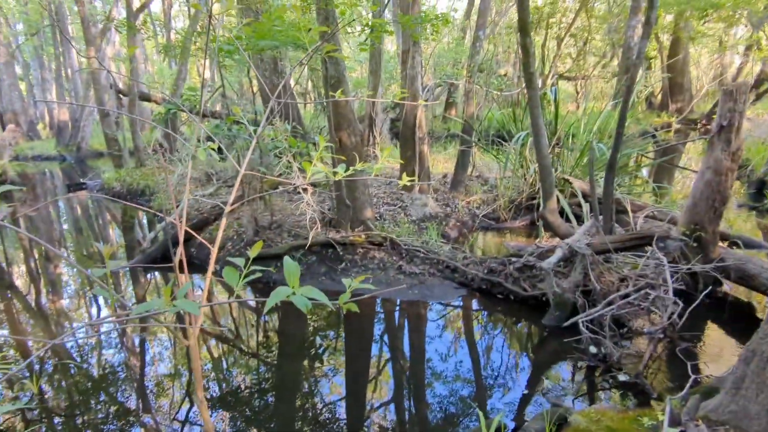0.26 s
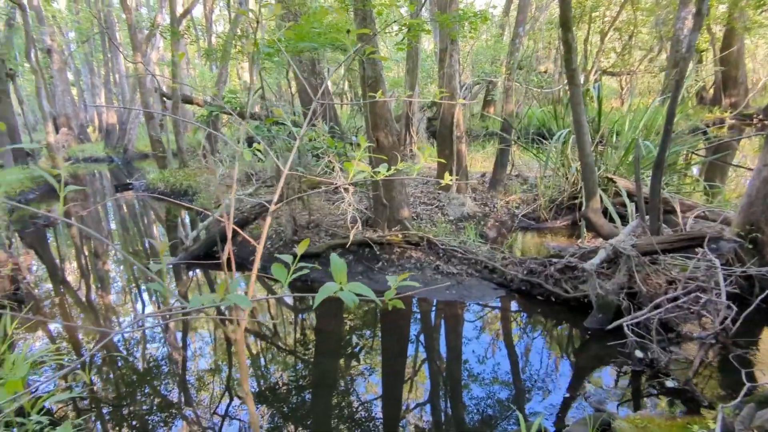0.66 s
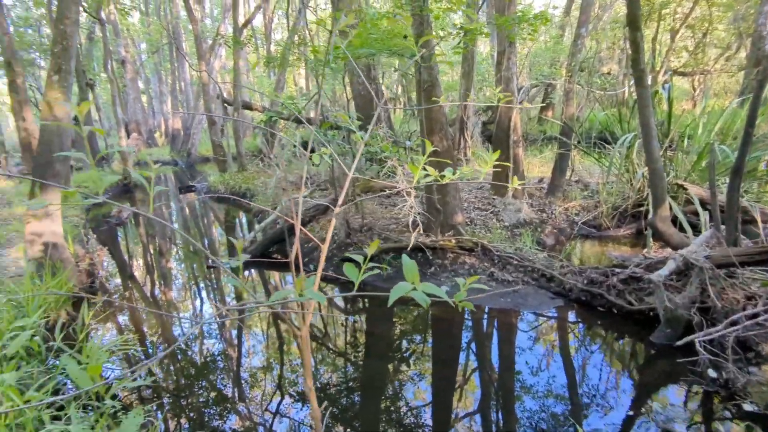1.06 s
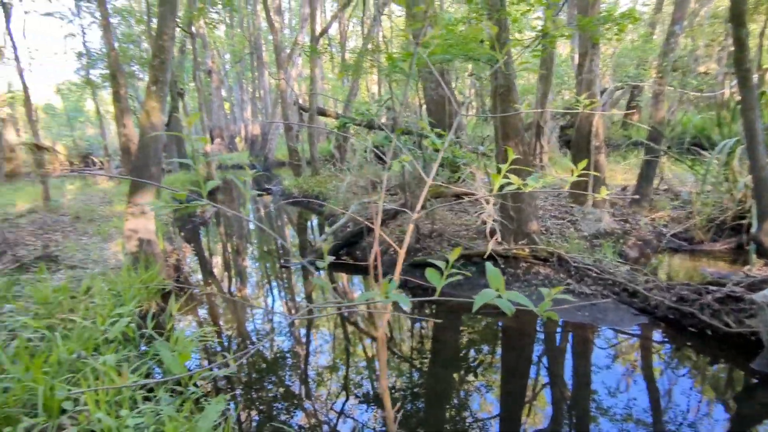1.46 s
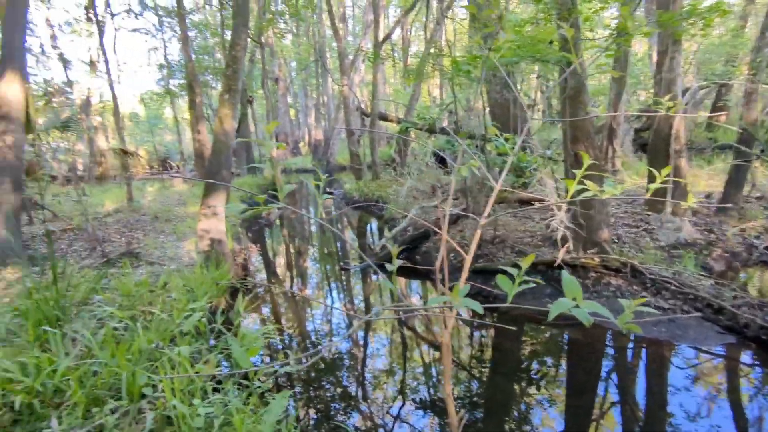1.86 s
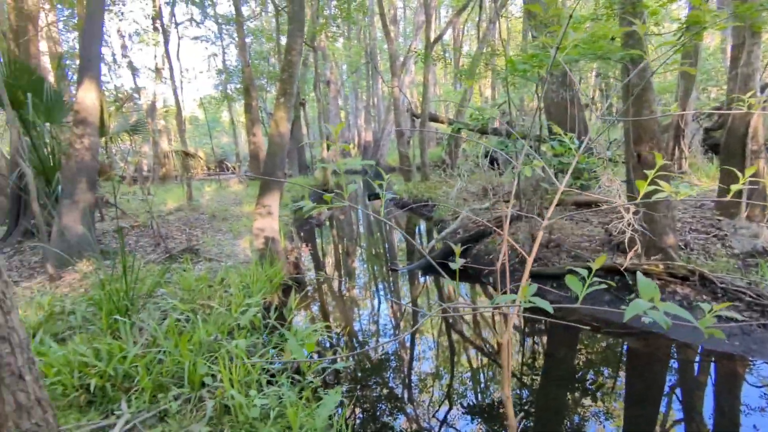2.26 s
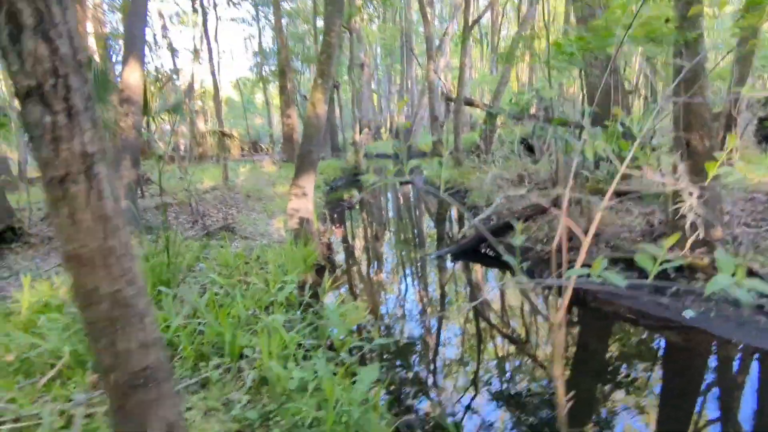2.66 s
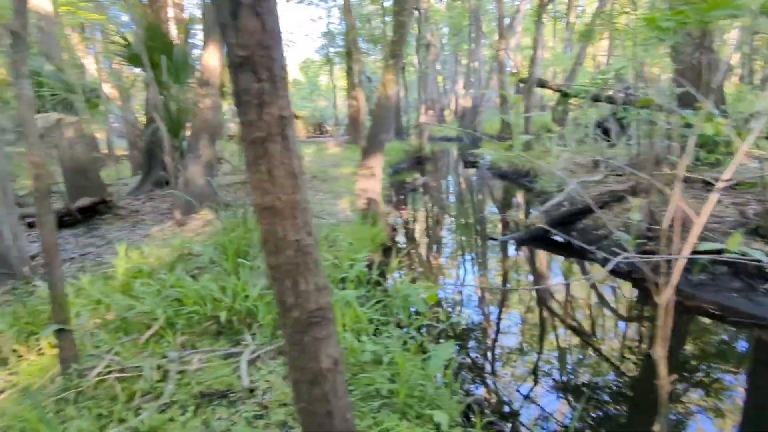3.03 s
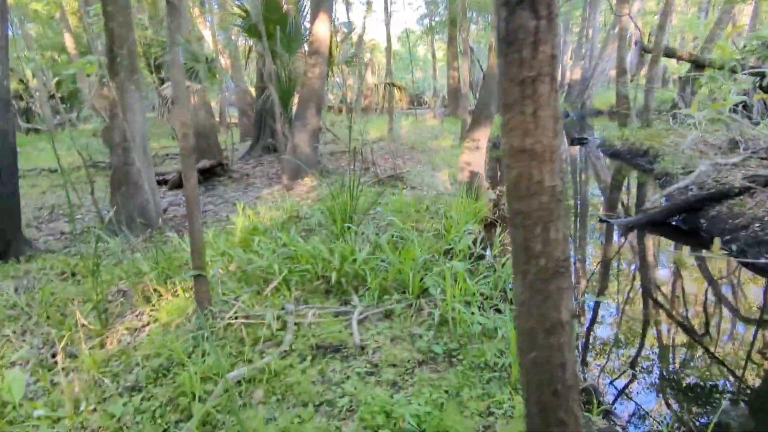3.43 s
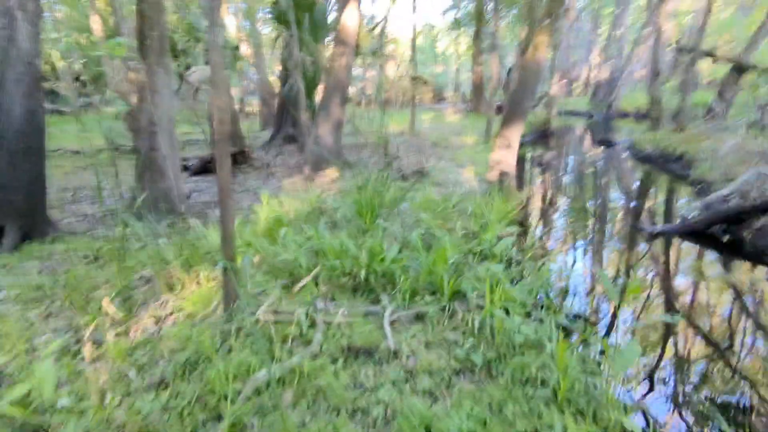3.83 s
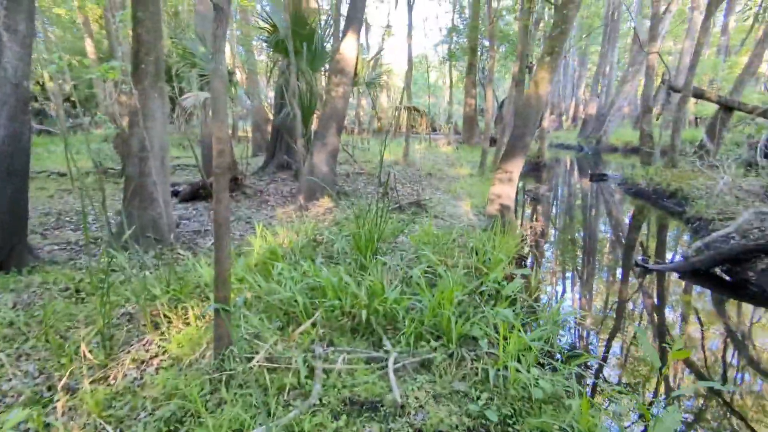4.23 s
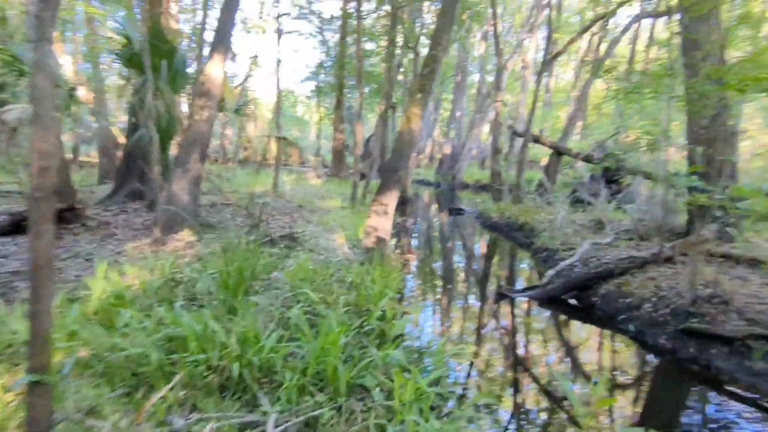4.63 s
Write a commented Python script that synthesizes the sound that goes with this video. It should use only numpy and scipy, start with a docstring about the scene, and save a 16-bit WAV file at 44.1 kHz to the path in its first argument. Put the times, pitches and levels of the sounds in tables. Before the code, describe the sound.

Distant highway traffic rumbles and roars through swampy woods, with a low engine drone fading, faint cricket chirps, and a few dry snaps late on.

```python
"""A highway heard from afar through swampy woods: from the start coloured noise makes rumble, roar and sizzle.
A heavy engine, a stack of sine orders, draws away; a near cricket chirps in short falling sine sweeps, far
insects hiss behind it, and the person holding the microphones turns slowly. Sine drones of other engines come
in midway; then plants are brushed, as swishing noise and dry snaps, while a nearer vehicle's roar grows to a
peak close to the end. A faint microphone hiss lies under it all."""
import sys
import numpy as np
from scipy import signal
from scipy.fft import rfft, irfft
from scipy.io import wavfile
from scipy.ndimage import map_coordinates

SR = 44100
rng = np.random.default_rng(int(sys.argv[2]) if len(sys.argv) > 2 else 0)


def master(y):
    """Save y as 16-bit WAV."""
    cut = np.clip(np.atleast_2d(y).T, -1, 1)
    pcm = np.round(cut * 32767)  # scale
    wavfile.write(sys.argv[1], SR, pcm.astype(np.int16))


N = 215776

# Spectra set only the shape of a noise; its loudness is given apart, as rms dB re full scale.
# In every left-right column, a positive level favours the left; a positive lag delays the left.

# Far lanes of the highway: columns [time_s, rumble_level_db, sizzle_level_db]
FAR_ROAD_LEVELS = [(0, -26.5, -45.5), (1, -27.5, -47.5), (2.3, -29.5, -46.5), (3.2, -31.5, -61.5),
                   (4, -30, -46.5), (4.89, -25.5, -43.5)]
# Low rumble of the far lanes: columns [frequency_hz, relative_density_db_per_hz]
RUMBLE_SPECTRUM = [(10, -58), (20, -30.5), (32, -20), (45, -4), (60, 5), (82, 6), (118, 2.5), (150, 1),
                   (190, -7), (235, -5.5), (270, -19.5), (400, -71.5), (1500, -110)]
# Tyre roar of the far lanes: columns [frequency_hz, relative_density_db_per_hz]
ROAR_SPECTRUM = [(60, -51), (120, -29), (220, -6), (330, 0.5), (560, -4), (880, -1.5), (1240, -10.5),
                 (1800, -21.5), (2600, -54), (5000, -100)]
# Tyre sizzle of the far lanes: columns [frequency_hz, relative_density_db_per_hz]
SIZZLE_SPECTRUM = [(400, -63.5), (800, -25), (1300, 0.5), (2030, -3.5), (3000, -16), (3800, -23.5),
                   (5400, -32), (7000, -43.5), (11000, -91.5)]
# Sound straight from the road: columns [frequency_hz, share_of_power (0 to 1)]
DIRECT_SHARE = [(60, 0.045), (300, 0.29), (800, 0.22), (1400, .4), (2000, 0.15), (4000, 0.4)]
# Sound scattered by the trunks: columns [frequency_hz, left_right_correlation (-1 to 1)]
SCATTER_LIKENESS = [(30, 1), (80, 0.99), (200, 1), (400, 0.58), (700, 0.084), (1000, 0.055), (1400, -0.18),
                    (2200, 0.22), (16000, -0.72)]
# Balance of the traffic noise: columns [frequency_hz, left_minus_right_db]
TRAFFIC_BALANCE = [(60, .3), (200, .3), (330, -1.2), (640, 1.8), (950, .5), (1410, 1), (2090, 1.5),
                   (3100, 2.5), (4600, 1)]
ROAR_DB, ROAD_LAG_MS = -33.5, -.42

# Heavy engine drawing away, its note sinking: columns [time_s, turns_per_s, loudest_order_level_db]
HEAVY_ENGINE = [(0, 21.5, -33), (.25, 21.5, -21), (.5, 21.3, -25.5), (.8, 21.1, -21), (1.27, 20.8, -19),
                (1.92, 20.65, -22.5), (2.05, 20.2, -30.5), (3, 20.4, -28.5), (3.6, 20.2, -31),
                (4.2, 20.3, -28.5), (4.5, 19.6, -35.5), (4.89, 19.9, -30.5)]
# Its other orders, swelling and fading: columns [start_s, end_s, order (multiple of turning), level_db]
ORDER_SWELLS = [(-0.5, 1.2, 3, -29), (2, 2.4, 3, -39.5), (2.5, 4.89, 3, -33.5), (0.76, 1.85, 7, -35),
                (0, .55, 8, -31), (0.2, 1.66, 8, -42), (1.94, 2.63, 8, -36), (2, 0.72, 10, -41.5)]
LOUDEST_ORDER = 5
DRONE_WAVER_DB, DRONE_WAVER_HZ = .7, .25
DRONE_FADE_DB_PER_S = 78.5  # both in and out

# Nearer vehicle's tyre roar: columns [frequency_hz, relative_density_db_per_hz]
NEARER_TYRE_SPECTRUM = [(60, -50.5), (150, -6), (300, -18), (600, -3.5), (780, -0.5), (950, -7),
                        (1200, -11), (2000, -18.5), (3200, -28), (5000, -38.5), (7000, -61), (12000, -90)]
CLOSEST_S, CLOSEST_DB, NEARER_LAG_MS = 4.67, -30.5, -.15
PASSING_S = 0.55  # closest distance over speed

# Near cricket as the microphones turn: columns [time_s, level_db, left_minus_right_db]
CRICKET_LEVELS = [(0, -58.5, 1.5), (.8, -59, 4), (1.2, -62, 0), (1.65, -61, 0), (2.3, -63, 0.5),
                  (2.75, -62.5, 0.5), (3.15, -57, -3), (3.9, -61, 0), (4.3, -61.5, 2), (4.89, -64, -5)]
# Its arrival as the microphones turn: columns [time_s, left_lag_ms]
CRICKET_LAG = [(0, -.15), (.7, -.12), (1.65, 0), (2.75, .05), (3.5, .17), (4.3, .205), (4.89, .09)]
# Successive chirps: one column [wing_strokes (count)]
CHIRP_STROKES = [4, 5, 4, 5, 5, 4, 4, 4, 5, 4, 5, 4, 5, 5, 4, 5, 5, 4, 4, 5, 5, 5, 4, 4, 4, 4, 4, 4, 5, 4,
                 5, 5, 4, 5, 4, 5, 4, 5, 4, 4, 4, 4, 4, 5, 6, 5, 5, 4]
FIRST_CHIRP_S, STROKE_PERIOD_S = -.0088, .0177
REST_S, REST_PER_STROKE_S = .01037, .00301  # a longer chirp earns a longer rest
SWEEP_S, SWEEP_FROM_HZ, SWEEP_TO_HZ = 0.012, 5100, 4144  # before each stroke's own pitch shift
FIRST_STROKE_DB = -2
STROKE_SPREAD_HZ, STROKE_SPREAD_DB = 60, 2.0
TRUNK_ECHO_DB, TRUNK_T60_S = -7, .07  # echo level re the direct song

# Far insects: columns [frequency_hz, relative_density_db_per_hz]
CHORUS_SPECTRUM = [(2500, -60.5), (3400, -55.5), (3900, -6), (4300, -2), (5000, -7), (5300, -10.5),
                   (5700, -45.5), (7000, -68.5)]
CHORUS_DB = -64.5

# Microphone hiss: columns [frequency_hz, relative_density_db_per_hz]
HISS_SPECTRUM = [(1000, -28), (3000, -5), (5500, -7.5), (6500, -10), (8000, -6), (9200, -1.5), (12000, -6),
                 (14000, -15), (16500, -9)]
HISS_DB, CUTOFF_HZ = -78.5, 15750

# Drones of other engines: columns [start_s, end_s, start_pitch_hz, end_pitch_hz, level_db]
OTHER_DRONES = [(2.351, 2.75, 96, 96.03, -32.5), (2.948, 4.6, 95.6, 94.64, -30.5),
                (3.9, 4.352, 214, 210, -39), (4.45, 4.891, 125, 125.2, -37), (4.55, 4.887, 152, 151, -37.5)]

# Cloth and leaves brushed near the microphones: columns [start_s, held_s, level_db before flutter]
BRUSHES = [(3.105, .008, -70.5), (3.26, .12, -74), (3.56, .03, -73), (3.775, 0.069, -55),
           (3.87, 0.048, -66), (3.95, .7, -72.5), (4.681, 0.098, -69), (4.785, 0.036, -54.5),
           (4.85, .05, -70)]
# Brushed leaves: columns [frequency_hz, relative_density_db_per_hz]
LEAF_SPECTRUM = [(1000, -51), (2500, -18), (4000, -4), (6500, -2), (7800, -4.5), (9500, -0.5), (12000, -2),
                 (13800, -5.5), (15200, -8), (16500, -5.5)]
BRUSH_RISE_DB_PER_S, BRUSH_FALL_DB_PER_S = 1001, 200

# Dry snaps, before filtering: columns [start_s, peak_level_db, left_minus_right_db, body_minus_crack_db]
SNAPS = [(3.108, -45, -7, 12), (3.384, -62, 3, -3), (3.522, -67, 0, 4), (3.566, -52, 0, -7),
         (3.585, -58, 1, -5), (3.690, -60, -1, -7), (3.761, -54, -2.5, 0), (3.781, -36.5, 4, 5),
         (3.903, -41.5, 6, 9), (3.945, -46, 1, 2), (4.002, -51, 4, -6), (4.183, -57, 7, -1),
         (4.784, -32, 0, 8), (4.803, -47, 0, 14), (4.824, -47, 0, 14.5), (4.829, -42, 3, 11)]
SNAP_T60_S = 0.012
SNAP_LOW_HZ, SNAP_SPLIT_HZ = 1500, 6000


def from_db(db):
    """Turn decibels into an amplitude factor."""
    return 10 ** (np.asarray(db) / 20)


def rms_one(x):
    """Scale to an rms of 1 over all samples and channels."""
    return x / np.sqrt(np.mean(x ** 2) + 1e-20)


def in_time(rows):
    """Read each column of a time table at every sample, joined by straight lines."""
    s, *columns = np.transpose(rows)
    return [np.interp(np.arange(N) / SR, s, column) for column in columns]


def at_hz(points):
    """Read a spectrum table at every FFT bin, on a log-frequency axis."""
    hz, value = np.transpose(points)
    bin_hz = np.maximum(np.fft.rfftfreq(N, 1 / SR), 1)
    return np.interp(np.log(bin_hz), np.log(hz), value)


def drift(rate_hz):
    """Slow chance: noise at every 40th sample through a double one-pole low-pass; rms 1."""
    pole = np.exp(-80 * np.pi * rate_hz / SR)
    noise = rng.standard_normal(N // 40 + 2002)
    slow = signal.lfilter([1], [1, -2 * pole, pole * pole], noise)[2000:]  # skip the settling
    return np.interp(np.arange(N) / 40, np.arange(len(slow)), rms_one(slow))


def swell(start_s, end_s, level_db, rise_db_per_s, fall_db_per_s):
    """A gain climbing in dB until its start and sinking in dB after its end."""
    t = np.arange(N) / SR
    below_rise = rise_db_per_s * np.maximum(start_s - t, 0)
    below_fall = fall_db_per_s * np.maximum(t - end_s, 0)
    return from_db(level_db - below_rise - below_fall)


def left_over_right(db):
    """Split a left-minus-right level evenly between the two channels, as gains."""
    return from_db(db * np.array([[.5], [-.5]]))


def arrive(wave, left_lag_ms):
    """One wave reaches both microphones, the left one late by the lag."""
    left_sample = np.arange(N) - np.clip(left_lag_ms, -2, 2) * SR / 1000
    left = map_coordinates(wave, [left_sample], order=3, mode="nearest")
    return np.array([left, wave])


def unrelated_noise(spectrum):
    """Coloured noise of its own in each channel, as from sources all around; rms 1."""
    white = rfft(rng.standard_normal((2, N)))
    return rms_one(irfft(white * from_db(at_hz(spectrum)), N))


def traffic_noise(spectrum, left_lag_ms):
    """Coloured noise, part straight from the road, part scattered by the trunks; rms 1."""
    mid, side, straight = rfft(rng.standard_normal((3, N))) * from_db(at_hz(spectrum))
    alike = np.clip(at_hz(SCATTER_LIKENESS), -1, 1)
    share = np.clip(at_hz(DIRECT_SHARE), 0, 1)
    # shared and opposed noise mix to the wanted left-right correlation
    scattered = np.sqrt(1 + alike) * mid + np.sqrt(1 - alike) * side * [[1], [-1]]
    scattered = scattered * np.sqrt((1 - share) / 2)
    late = np.exp(-2j * np.pi * np.fft.rfftfreq(N, 1 / SR) * left_lag_ms / 1000)
    direct = straight * np.sqrt(share) * [late, np.ones_like(late)]
    balance = left_over_right(at_hz(TRAFFIC_BALANCE))
    return rms_one(irfft((scattered + direct) * balance, N))


def far_road():
    """Rumble, tyre roar and sizzle of the far lanes, each a band of noise with its own level."""
    rumble_db, sizzle_db = in_time(FAR_ROAD_LEVELS)
    rumble = from_db(rumble_db) * traffic_noise(RUMBLE_SPECTRUM, ROAD_LAG_MS)
    roar = from_db(ROAR_DB + 0.24 * drift(3.1)) * traffic_noise(ROAR_SPECTRUM, ROAD_LAG_MS)
    sizzle = from_db(sizzle_db + 0.33 * drift(12.0)) * traffic_noise(SIZZLE_SPECTRUM, ROAD_LAG_MS)
    return rumble + roar + sizzle


def drone(hz, gain):
    """A firing tone that wavers a little in level and pitch on its long way through the air."""
    turns = np.cumsum(hz + DRONE_WAVER_HZ * drift(3.07)) / SR + rng.random()
    tone = np.sqrt(2) * np.sin(2 * np.pi * turns)  # rms 1
    return gain * from_db(DRONE_WAVER_DB * drift(2.7)) * tone


def heavy_engine():
    """One engine's orders: tones at whole multiples of its turning rate."""
    turns_per_s, level_db = in_time(HEAVY_ENGINE)
    out = drone(LOUDEST_ORDER * turns_per_s, from_db(level_db))
    for order in sorted({round(row[2]) for row in ORDER_SWELLS}):
        gains = [swell(start_s, end_s, db, DRONE_FADE_DB_PER_S, DRONE_FADE_DB_PER_S)
                 for start_s, end_s, number, db in ORDER_SWELLS if round(number) == order]
        out += drone(order * turns_per_s, np.max(gains, axis=0))
    return arrive(out, ROAD_LAG_MS)


def nearer_vehicle():
    """Tyre roar of a nearer vehicle drawing up, its amplitude going as one over distance."""
    distance = np.hypot(1, (np.arange(N) / SR - CLOSEST_S) / PASSING_S)  # re the closest
    return from_db(CLOSEST_DB) / distance * traffic_noise(NEARER_TYRE_SPECTRUM, NEARER_LAG_MS)


def cricket_song():
    """Wing strokes at a steady pace until the rest before the next chirp; each falls in pitch."""
    t = np.arange(round(SWEEP_S * SR)) / SR
    turns = np.cumsum(np.interp(t, [0, SWEEP_S], [SWEEP_FROM_HZ, SWEEP_TO_HZ])) / SR
    shape = np.hanning(len(t)) ** .7
    song, chirp_s = np.zeros(N + SR), FIRST_CHIRP_S
    for strokes in CHIRP_STROKES:
        chance = rng.standard_normal((8, 3))  # each stroke's own level, pitch and phase
        for k in range(strokes):
            level_db = FIRST_STROKE_DB * (k == 0) + STROKE_SPREAD_DB * chance[k, 0]
            shifted_turns = turns + STROKE_SPREAD_HZ * chance[k, 1] * t + chance[k, 2]
            at = round((chirp_s + k * STROKE_PERIOD_S) * SR)
            if at >= 0:
                song[at:at + len(t)] += from_db(level_db) * shape * np.sin(2 * np.pi * shifted_turns)
        chirp_s += strokes * (STROKE_PERIOD_S + REST_PER_STROKE_S) + REST_S
    return song[:N]


def cricket():
    """The near song at two turning microphones, with echoes thrown back by trunks and water."""
    song = cricket_song()
    level_db, pan_db = in_time(CRICKET_LEVELS)
    left_lag_ms, = in_time(CRICKET_LAG)
    age = np.arange(SR // 5) / SR
    scatter = rng.standard_normal((2, len(age))) * from_db(-60 * age / TRUNK_T60_S)
    echoes = rms_one(signal.fftconvolve(song[None], scatter, axes=1)[:, :N])
    near = rms_one(arrive(song, left_lag_ms)) * left_over_right(pan_db)
    return from_db(level_db) * (near + from_db(TRUNK_ECHO_DB) * echoes)


def far_insects():
    """Many distant singers merged into a band of noise whose level flickers slightly."""
    return from_db(CHORUS_DB + 1.0 * drift(11.0)) * unrelated_noise(CHORUS_SPECTRUM)


def microphone_hiss():
    """Faint noise of the microphones' own, unrelated left to right."""
    return from_db(HISS_DB + 1.0 * drift(6.0)) * unrelated_noise(HISS_SPECTRUM)


def other_engines():
    """Far drones of other engines, each a single tone gliding between two pitches."""
    out = np.zeros(N)
    for start_s, end_s, from_hz, to_hz, level_db in OTHER_DRONES:
        hz, = in_time([(start_s, from_hz), (end_s, to_hz)])
        out += drone(hz, swell(start_s, end_s, level_db, DRONE_FADE_DB_PER_S, DRONE_FADE_DB_PER_S))
    return arrive(out, ROAD_LAG_MS)


def brushing():
    """A swish of leaf noise made grainy by fast chance changes of level."""
    touch = sum(swell(start_s, start_s + held_s, level_db, BRUSH_RISE_DB_PER_S, BRUSH_FALL_DB_PER_S)
                for start_s, held_s, level_db in BRUSHES)
    grain = from_db(2.5 * drift(200) + .7 * drift(40))
    return touch * grain * unrelated_noise(LEAF_SPECTRUM)


def dry_snaps():
    """Decaying noise bursts, each split into a bright crack and a duller body."""
    age = np.arange(SR // 40) / SR
    crack, body = np.zeros((2, 2, N + len(age)))
    for start_s, peak_db, pan_db, body_db in SNAPS:
        decay = from_db(peak_db - 60 * age / SNAP_T60_S)
        burst = rng.standard_normal((2, len(age))) * decay * left_over_right(pan_db)
        at = round(start_s * SR)
        crack[:, at:at + len(age)] += burst
        body[:, at:at + len(age)] += burst * from_db(body_db)
    bright = signal.butter(2, SNAP_SPLIT_HZ, "high", fs=SR, output="sos")
    dull = signal.butter(2, [SNAP_LOW_HZ, SNAP_SPLIT_HZ], "band", fs=SR, output="sos")
    return (signal.sosfilt(bright, crack) + signal.sosfilt(dull, body))[:, :N]


def scene():
    """Highway, engines, cricket, far insects and brushed plants, summed at the two microphones."""
    highway = far_road() + heavy_engine() + nearer_vehicle() + other_engines()
    insects = cricket() + far_insects()
    plants = brushing() + dry_snaps()
    return highway + insects + plants


def record(dry):
    """The microphones add a faint hiss; a steep low-pass cuts the top."""
    low_pass = signal.ellip(10, .5, 70, CUTOFF_HZ, fs=SR, output="sos")  # ripple, stopband in dB
    return signal.sosfilt(low_pass, dry + microphone_hiss())


dry = scene()
out = record(dry)
master(out)
```